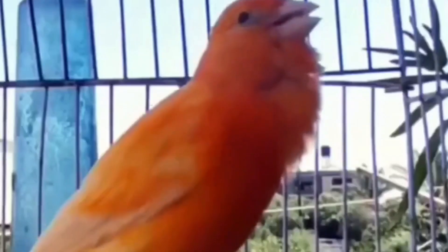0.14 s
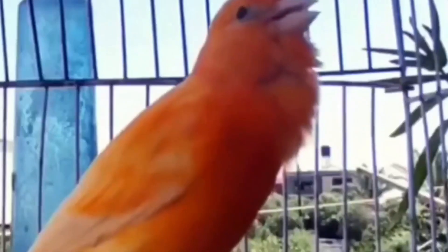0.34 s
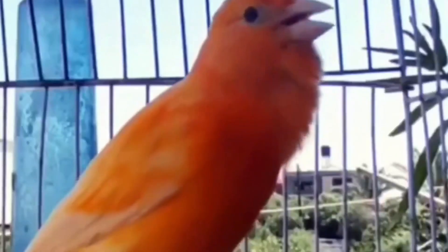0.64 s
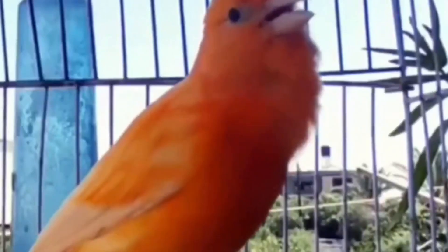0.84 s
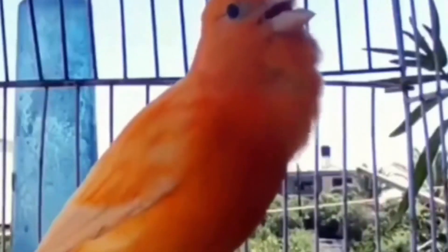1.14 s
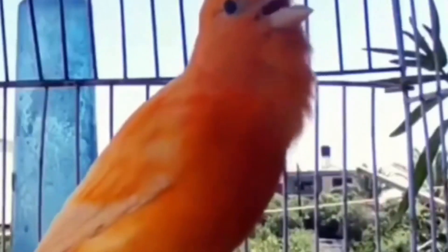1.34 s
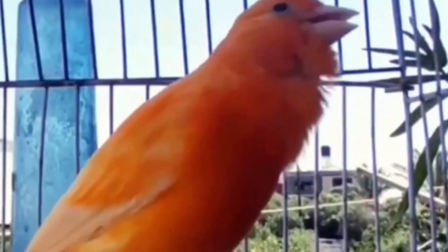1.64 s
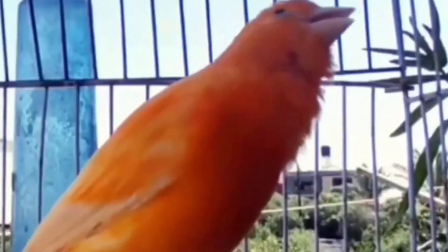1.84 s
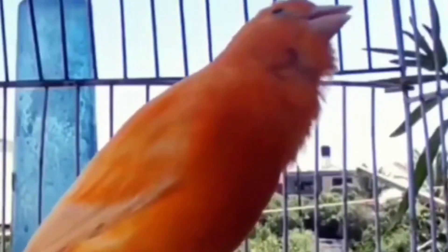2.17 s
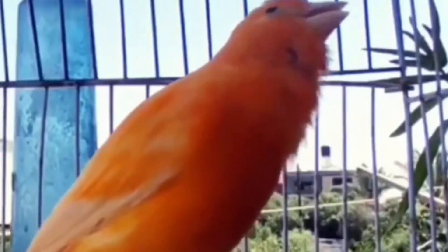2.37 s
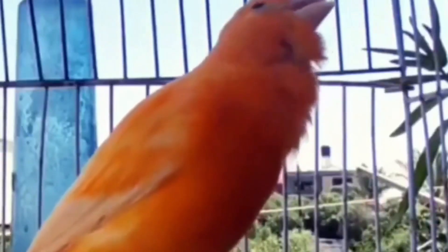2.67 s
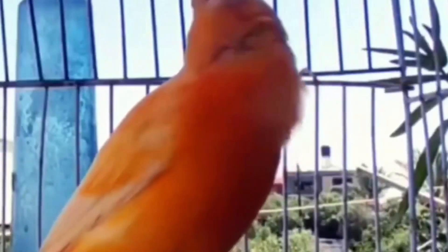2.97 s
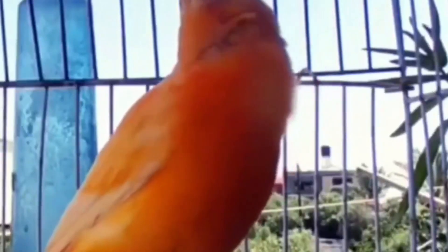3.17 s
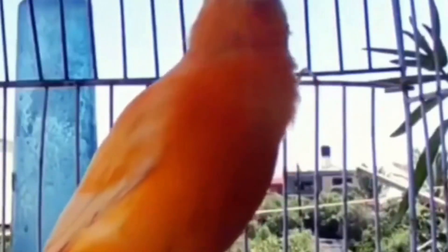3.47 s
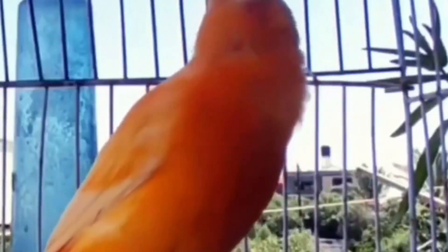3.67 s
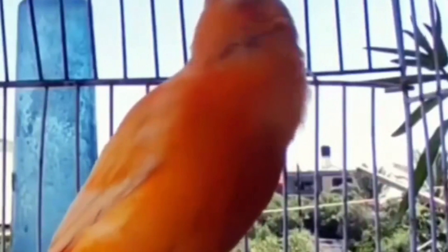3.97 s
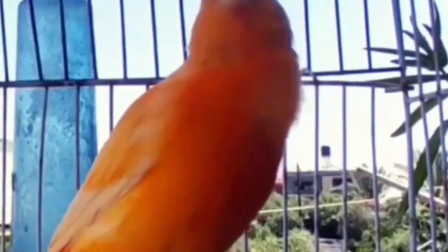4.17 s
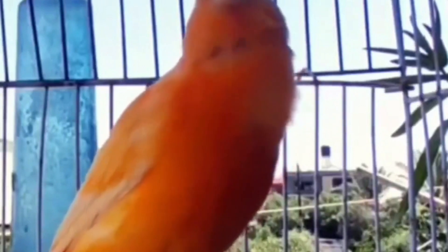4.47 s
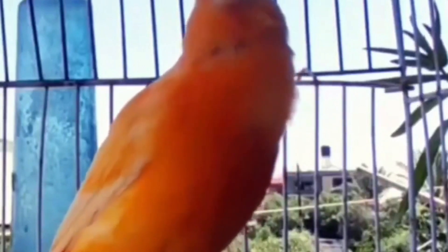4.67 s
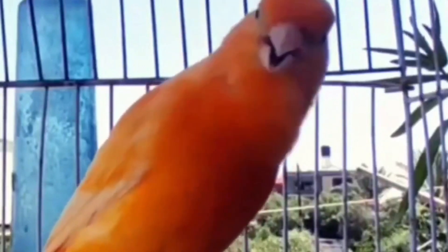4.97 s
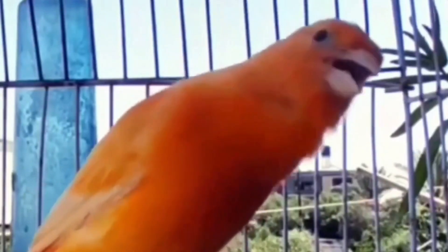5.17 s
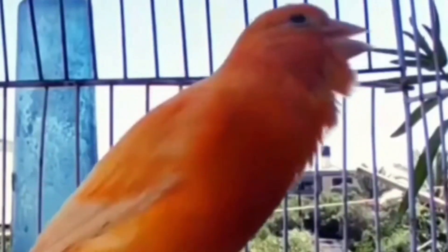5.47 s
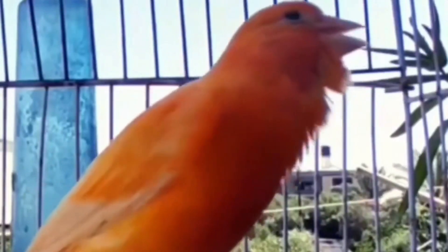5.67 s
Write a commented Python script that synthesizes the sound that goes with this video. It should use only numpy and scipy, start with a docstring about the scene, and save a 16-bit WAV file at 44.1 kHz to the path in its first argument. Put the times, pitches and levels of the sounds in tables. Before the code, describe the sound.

Loud, clear canary song, close and bright, on a balcony. A rapid burst of descending chirps turns into a slightly slower roll lasting nearly five seconds, its notes changing subtly from crisp to more drawn-out and back. A short steady pipe then switches to quick upward whistles, still going at the cut. Short diffuse reflections, a hissy phone microphone and very soft wind surround it.

```python
"""Canary on a balcony

A caged canary sings an arm's length from a phone: a quick trill, a long roll of falling whistles,
one piped note, then rising whistles. Each whistle is a sine that glides in pitch, roughened by noise.
Nearby walls add echoes of noise, a hiss and a wash follow the song's loudness, and wind rumbles.
Early on the level dips briefly, and it returns a little lower."""
import sys
import numpy as np
from scipy import signal
from scipy.fft import rfft, irfft
from scipy.io import wavfile
from scipy.ndimage import uniform_filter1d

SR = 44100
rng = np.random.default_rng(int(sys.argv[2]) if len(sys.argv) > 2 else 0)


def dump_mix(stems):
    """Bounce the given channels to the path in sys.argv[1] as a 16-bit WAV at rate SR."""
    frames = np.atleast_2d(stems).T  # one column per channel
    limited = np.clip(frames, -1, 1)  # hard clip at full scale
    pcm = np.round(limited * 32767).astype(np.int16)
    wavfile.write(sys.argv[1], SR, pcm)


N = 256220

# Whistle levels are those before the throat colours them.
# Every glide has a low end, a knee and a high end, joined by a low leg and a high leg.
# Quick falling whistles: (low end [s], low leg level [dB], high leg level [dB], noise share [0-1])
QUICK_TRILL = [(0.0976, -17, -27.5, 0.04), (0.1335, -15.5, -34, 0.5), (0.167, -14, -28, 0.2),
               (.203, -7, -36, 0.2), (0.2373, -13, -28, 0), (0.2733, -10.5, -27, 0.3),
               (0.308, -6.5, -26, 0), (0.3443, -11.5, -33, 0.66), (0.3819, -12.5, -26, 0.2),
               (0.418, -14, -26, 0.15), (.4532, -11, -29.5, 0.2), (0.492, -15, -29.5, 0.1),
               (0.5296, -21.5, -27.5, 0.11)]
# Falling whistles of the long roll; both legs play 1 % shorter than listed: (low end [s],
# low leg [ms], high leg [ms], low pitch [Hz], low leg level [dB], knee level [dB],
# high leg level [dB], top level [dB], left minus right [dB])
ROLL = [(0.693, 5.7, 20.6, 4740, -8, -15, -19, -18, -6),
        (0.7773, 11.6, 21, 4250, -11.5, -21.5, -26, -21, -2.5),
        (0.8605, 13.6, 25, 4370, -11.5, -23, -30, -20, -1.5),
        (0.9423, 14.6, 14.4, 4290, -12, -22, -29.5, -36, -4.5),
        (1.0244, 12.3, 17, 4300, -12.5, -20, -34, -22, -2.5),
        (1.102, 14.2, 18, 4270, -11, -19.5, -26, -27, -4.5),
        (1.1844, 13.8, 22, 4290, -10, -20.5, -27, -18, -3),
        (1.2655, 16, 16.6, 4270, -10.5, -21.5, -26, -28, -3),
        (1.347, 16.6, 38, 4230, -10.0, -23, -39, -34, -4),
        (1.435, 22.7, 12, 4250, -18, -12, -36, -39.0, -1),
        (1.5095, 16.2, 20, 4240, -9.5, -23.5, -30, -24, -4),
        (1.5887, 17.7, 15, 4215, -10.5, -26, -24.5, -18, -3.5),
        (1.672, 18.5, 15.6, 4195, -9.5, -25.5, -24, -18.5, -1),
        (1.759, 23.6, 12.0, 4180, -11, -27.5, -26, -30.0, -1.5),
        (1.847, 28.8, 19, 4080, -11, -30, -28, -23, -1.0),
        (1.9378, 38, 15, 3820, -11.5, -31, -31, -22, -0.5),
        (2.0256, 37.3, 19, 3970, -12, -26.5, -26.5, -46, -0.5),
        (2.1136, 36, 19, 3930, -11.5, -23.5, -22, -21, -1),
        (2.2018, 38.3, 18, 3894, -8.5, -24, -25.5, -18.5, -1.5),
        (2.2893, 36.5, 11.5, 3860, -12, -26, -25, -21, -1.5),
        (2.3788, 38.7, 17, 3830, -11.5, -28, -35, -42.0, -1),
        (2.468, 40.6, 15, 3795, -12, -29, -30, -22, -2),
        (2.5584, 42.5, 11.6, 3810, -11.5, -30, -27.5, -21, -1.5),
        (2.6444, 40, 12, 3820, -10.5, -31, -30, -20, -1),
        (2.7342, 40.3, 14.4, 3990, -12.5, -28.5, -29.5, -17, -2),
        (2.828, 40, 16.6, 3796, -12, -28, -28.5, -19.5, -1.5),
        (2.918, 35, 19, 3800, -11.5, -23, -23, -25, -3.0),
        (3.0061, 33, 16, 3880, -9.5, -36, -28, -17, -2.5),
        (3.099, 34.4, 20, 3870, -11, -23, -20.5, -16, -4.5),
        (3.19, 38.3, 16.6, 3820, -10.5, -21, -22, -20, -3.5),
        (3.2793, 30.8, 20, 3850, -10.5, -23, -20.5, -16, -5),
        (3.3753, 36.7, 19, 3775, -10.5, -29, -18.5, -15, -5.5),
        (3.469, 40.4, 19, 3535, -10.5, -26, -19, -24, -5),
        (3.563, 39.5, 19, 3610, -10.5, -25.5, -19.5, -15, -4.5),
        (3.649, 38.2, 15.2, 3740, -9.5, -20, -20, -8.5, -4),
        (3.7407, 34, 19, 3905, -10, -22.5, -20.5, -17, -3),
        (3.835, 37.5, 16.3, 3920, -10.5, -23.5, -18, -14, -5.5),
        (3.927, 30.5, 19, 3810, -10, -23, -22.5, -13, -5),
        (4.0133, 26.6, 20.0, 3976, -10.5, -23, -20.5, -13, -4),
        (4.0953, 15.8, 25, 4200, -10.5, -23.5, -33, -26, -5),
        (4.1746, 12.8, 25.5, 4140, -8.5, -20, -32, -15.5, -4),
        (4.253, 10.9, 18.6, 4150, -8, -21.5, -29.5, -13.5, -3.5),
        (4.3348, 11.2, 20.4, 4160, -8.5, -18, -26.5, -16, -4),
        (4.414, 10.6, 24.4, 4160, -7, -18.5, -29.5, -17, -5),
        (4.499, 10.7, 27.5, 4060, -9.5, -23, -23.5, -27, 1),
        (4.577, 12.4, 22.4, 4230, -9, -19.5, -23.5, -19.5, -4.5),
        (4.657, 13, 21.4, 4190, -10, -18, -27, -14.5, -5.5),
        (4.735, 12.7, 20.3, 4250, -8.5, -18.5, -24.5, -14.5, -5.0),
        (4.8156, 13, 12.8, 4160, -7.5, -17, -22, -26, -4.5),
        (4.8983, 11, 20.4, 4160, -9.5, -14.5, -32, -13, -5),
        (4.982, 13.3, 18.4, 4350, -10.5, -16, -23, -20, -4),
        (5.0678, 11.3, 20.3, 4240, -10.5, -20, -27, -17, -3),
        (5.16, 19, 22.4, 4280, -11, -21.5, -25.5, -18, 2.5),
        (5.242, 20.6, 19.0, 4280, -14, -28, -26.5, -28, -7.5),
        (5.3211, 13.8, 17.3, 4200, -9.5, -25, -23.5, -16, -2.0),
        (5.4016, 11, 19, 4170, -8, -14, -25.5, -36, -3.5)]
# Rising whistles: (low end [s], level [dB])
RISES = [(5.5218, -11.5), (5.585, -11.5), (5.647, -10.5), (5.7142, -11), (5.7806, -11)]
# First held note: (time [s], pitch [Hz], level [dB])
CHUP = [(0, 2600, -36), (.005, 2800, -28), (.009, 2930, -32), (.014, 2990, -24), (.018, 3000, -28),
        (.021, 3000, -42), (.032, 2950, -39), (.042, 2900, -50)]
# Piped note before the rising whistles: (time [s], pitch [Hz], level [dB])
PIPE = [(5.453, 5220, -38), (5.457, 5190, -21), (5.468, 5130, -16.5), (5.484, 5180, -18.5),
        (5.487, 5300, -23), (5.49, 5550, -19.5), (5.493, 5700, -40)]
# Thin puffs ahead of a whistle, 4 dB softer in the middle: (start [s], length [ms], centre [Hz], level [dB])
LISPS = [(0.635, 31, 6820, -31.5), (0.729, 27, 6800, -26.5), (.8, 20, 7000, -30), (0.891, 23, 6850, -26),
         (.965, 23, 7300, -35), (1.057, 21.5, 7000, -21.5), (1.12, 32, 6950, -23.5), (1.213, 31, 6900, -23),
         (1.292, 37, 6960, -32), (1.3796, 20, 6950, -27.5), (1.45, 23, 7000, -28), (1.538, 24, 6840, -29.5),
         (1.6165, 22, 6850, -25.5), (1.705, 24, 6930, -29), (2.584, 31, 6570, -27.5),
         (2.744, 20, 6800, -33), (2.844, 22, 6680, -28), (2.935, 21, 6840, -32), (3.589, 21, 6830, -33),
         (3.9604, 24, 7000, -30), (4.049, 29, 7100, -32), (4.2223, 27, 7000, -32), (4.284, 24, 6970, -23.5),
         (4.375, 29, 7000, -31), (4.4457, 19, 6870, -27.5), (4.512, 27, 7000, -32.5),
         (4.61, 24, 6800, -29.5), (4.686, 20, 7250, -33), (4.7706, 24, 6900, -29), (4.829, 35, 6950, -25),
         (4.931, 31, 6900, -26), (5.022, 27, 7000, -29), (5.095, 25, 6900, -28), (5.187, 23, 6960, -28.5)]
# Bursts of band noise that cover a whistle, whose tone sinks meanwhile:
# (start [s], length [ms], centre [Hz], width [Hz], level [dB])
NOISE_BURSTS = [(0.181, 22.6, 5000, 1600, -28), (.259, 10.4, 4660, 1200, -25), (0.293, 34, 4660, 1400, -30),
                (0.368, 9.7, 4700, 1200, -26), (0.681, 26, 4900, 1500, -31), (1.4, 27.6, 4720, 1020, -20.5),
                (2.168, 27.6, 4500, 895, -23.5), (2.973, 17.2, 5350, 450, -18),
                (3.803, 19.5, 4730, 1000, -25), (4.051, 27, 5600, 1400, -25),
                (4.478, 24.2, 4980, 1290, -19.5), (4.769, 22, 6030, 1300, -29),
                (4.866, 24.8, 5500, 900, -25.5), (5.145, 19.8, 4870, 1000, -23),
                (1.703, 25, 5900, 1400, -31.5), (5.388, 6.1, 5300, 800, -22), (5.588, 27, 4930, 1300, -18)]
# Broad puff as a falling whistle of the roll stops: (time [s], level against its low leg [dB])
END_PUFF = [(.7, -37.5), (1.2, -33.5), (1.8, -71), (3.6, -46), (4.1, -70), (4.55, -26.5), (4.9, -34),
            (5.4, -34)]
# How the throat colours a whistle: (pitch [Hz], gain [dB])
THROAT = [(3600, -9.5), (4200, 0), (4700, -2), (5250, 6.5), (5600, -1.5), (6100, -9), (6600, -9),
          (7200, 31)]
# A wide open throat, which colours nothing: (pitch [Hz], gain [dB])
OPEN_THROAT = [(3600, 0), (7200, 0)]
# Slow level of the faint line above the whistles: (time [s], level [dB])
TWIN_SWELL = [(1.6, -14), (2.0, 0), (3.8, 0), (4.1, -14), (5.45, -14), (5.55, -4)]
# Colour of the hiss; only the differences count: (frequency [Hz], level [dB])
HISS_COLOUR = [(120, 1.5), (500, 5), (2000, 3), (3050, 7), (3500, 3.5), (3900, 10.5), (7200, 11.5),
               (8500, 21), (8950, -13.5), (9550, 19), (9900, -7), (10600, 13), (11500, 5.5), (12300, 4),
               (12900, -16)]
# How three hiss ranges follow the song: (upper limit [Hz], smoothing [ms], power [], level [dB])
HISS_FOLLOW = (3944, 11.6, 0.48, -30), (9000, 8.2, 0.82, -30), (20000, 19, 0.59, -40)
# Slow level of the noise bands: (time [s], wash [dB], extra for the upper wash [dB],
# hiss under 4 kHz [dB], hiss up to 9 kHz [dB], hiss above [dB])
NOISE_SWELL = [(0, 14, -5, 4, 5.5, 2), (.55, 3, -6, 6.5, 7, 8.5), (.65, -13, 0, -4.5, -7, -18),
               (.69, 3.5, -1, 4.5, 0, 8), (.9, 2, 2, 4.5, 3, 6.5), (1.4, 1.5, 0, 5.5, 0, 1),
               (1.9, -0.5, -0.5, 4, 5, 2), (2.4, -1, 1.5, 4, 4.5, -1), (3.0, 1.5, -1.5, 4, 4, -1),
               (3.5, -1.5, 1.5, 5.5, 6, -1), (4.1, -1.5, 5.5, 4, 5.5, -1), (4.6, -3.5, 4.5, 5.5, 2.5, 6),
               (5.3, 5.5, -2.5, 5.5, 4.5, 3.5), (5.47, -5.5, -25, 5, 4, 8), (5.6, 8.5, 4, 8.5, -10, 15),
               (5.8, 4.5, 1.5, 7.5, 1, 11)]
# Strength of the wind: (time [s], level [dB])
WIND = [(0, -55), (.8, -60), (1.45, -52.5), (1.68, -57.5), (2.5, -56.5), (3.25, -49.5), (3.85, -53.5),
        (4.44, -55.5), (4.56, -37), (4.72, -53), (5.0, -46.5), (5.3, -55), (5.55, -48), (5.8, -48)]

QUICK_KNEE_HZ, KNEE_HZ = 4706, 5242
QUICK_LEGS_MS, QUICK_ENDS_HZ = (8.3, 8.2), (3360, 6030)  # low, high
QUICK_KNEE_DB, QUICK_TOP_DB, QUICK_PAN_DB = -20.5, -1, -0.8  # top against the high leg
ROLL_TOP_HZ, CLEAR_NOISE, BURST_NOISE = 6123, 0.019, 0.16  # noise share 0-1, without and with a burst
RISE_LEGS_MS, RISE_ENDS_HZ = (15, 19), (3737, 6030)  # low, high
RISE_KNEE_DB, RISE_HIGH_DB, RISE_HOOK_DB = -3.5, -2.5, -7  # all against the level of the whistle
RISE_PAN_DB, RISE_NOISE = -0.5, 0.079
END_FLICK_HZ = 343  # a falling whistle drops steeply as it stops
TWIN_ABOVE_HZ, TWIN_DB, TWIN_BAND_HZ = 6150, -38, (10000, 12100)  # faint line parallel to a whistle
TRILL_BAND_HZ = 3650, 7080  # the throat passes little of a trill outside this band
END_PUFF_MS, END_PUFF_EARLY_MS, END_PUFF_SCATTER_DB, END_PUFF_TREBLE_DB = 12.5, 8.9, 5, -5
NEAR_ECHO_DB, SIDE_ECHO_S, HELD_ECHO_DB = -47, 0.021, -14
WASH_LATE_MS = 11.6
DIP_S = 0.0594, 0.081  # start and end of the dip in level
PHONE_DB, TOP_HZ = -0.54, 13770


def undb(db):
    """Turn a level in dB into a gain."""
    return 10 ** (np.asarray(db) / 20)


def unit(x):
    """Scale a sound to an average strength (rms) of 1."""
    return x / np.sqrt(np.mean(x ** 2))


def stereo(mid, side):
    """Add the side sound on the left and subtract it on the right."""
    return mid + side * np.array([[1], [-1]])


def pan(left_minus_right_db):
    """Left and right gains."""
    return undb([[left_minus_right_db / 2], [-left_minus_right_db / 2]])


def over_time(table, column=1):
    """Read one column of a table at every sample; column 0 is the time."""
    columns = np.transpose(table)
    return np.interp(np.arange(N) / SR, columns[0], columns[column])


def on_log_hz(table, hz):
    """Read (frequency [Hz], level [dB]) points along a logarithmic pitch scale."""
    at, db = np.transpose(table)
    return np.interp(np.log(np.maximum(hz, 1)), np.log(at), db)


def band(lo_hz, hi_hz, size=N):
    """Noise between two edges, rms 1."""
    sos = signal.butter(2, [lo_hz, hi_hz], "bandpass", fs=SR, output="sos")
    return unit(signal.sosfilt(sos, rng.standard_normal(size)))


def steep(x, lo_hz, hi_hz):
    """Keep a band with sharp edges."""
    sos = signal.cheby2(6, 30, [lo_hz / 1.0593, hi_hz * 1.04], "bandpass", fs=SR, output="sos")
    return signal.sosfiltfilt(sos, x)


def loudness(song, swell_ms):
    """Strength (rms) of the song, smoothed twice over swell_ms."""
    size = int(swell_ms * SR / 1000)
    power = np.mean(song ** 2, axis=0)
    smooth = uniform_filter1d(uniform_filter1d(power, size), size)
    return np.sqrt(smooth.clip(0))


def puff(s, ms, hz, width_hz, db):
    """Where a short band of noise sits, its gate and the gated noise."""
    start, size = int(s * SR), int(ms * SR / 1000)
    gate = signal.windows.tukey(size, .4)
    noise = band(hz - width_hz / 2, hz + width_hz / 2, size=4096)[-size:]
    return slice(start, start + size), gate, undb(db) * gate * noise


def wind():
    """Wind on the microphone: low noise, mostly the same left and right, that swells in gusts."""
    gust = undb(over_time(WIND) + 1.4 * band(0.9, 33))
    rumble = 0.5 * band(19, 43.0) + 0.26 * band(32, 178)
    return gust * stereo(rumble, 0.15 * band(22, 95))


def hiss(song, bed_db=-70, side_db=-6.0):
    """Broad hiss that follows the song over a faint bed; half octaves flicker alone and together."""
    hz, out = np.fft.rfftfreq(N, 1 / SR), 0
    colour = undb(on_log_hz(HISS_COLOUR, hz)) * (hz > 90)
    colour = colour / np.sqrt(np.mean(colour ** 2))
    together_db = 0.88 * band(1.3, 7.8)
    follows = []
    for k, (_, ms, power, db) in enumerate(HISS_FOLLOW):
        moving = undb(db + together_db) * loudness(song, ms) ** power
        follows.append(undb(over_time(NOISE_SWELL, 3 + k)) * (moving + undb(bed_db)))
    for centre in 125 * np.sqrt(2) ** np.arange(14):
        # neighbouring half octaves overlap and crossfade
        octaves_away = abs(np.log2(hz + 1) - np.log2(centre))
        share = np.clip(1 - octaves_away * 2, 0, 1) ** .5
        mid, side = irfft(rfft(rng.standard_normal((2, N))) * colour * share, N)
        follow = follows[sum(centre >= row[0] for row in HISS_FOLLOW)]
        flicker = undb(3.9 * band(2.5, 21.8) - 3.0)
        out = out + follow * flicker * stereo(mid, undb(side_db) * side)
    return out


def wash(song, wash_db=-17, side_db=-5):
    """Grainy noise in the band of the trills; it follows the song smoothly and a little late."""
    grains = 0
    for lo_hz, hi_hz, db in [(4040, 4230, -4.0), (3920, 5280, 4.0), (4700, 5960, -15.5), (5720, 6520, -1.5)]:
        mid, side = band(lo_hz, hi_hz), band(lo_hz, hi_hz)
        upper_db = (lo_hz > 4500) * over_time(NOISE_SWELL, 2)
        flicker_db = 3.9 * band(0.99, 57)
        grains = grains + undb(db + upper_db + flicker_db) * stereo(mid, undb(side_db) * side)
    late_song = np.pad(loudness(song, 54), (int(WASH_LATE_MS * SR / 1000), 0))[:N]
    level = undb(wash_db + over_time(NOISE_SWELL, 1))
    return level * late_song * steep(unit(grains), *TRILL_BAND_HZ)


def walls(song, t60_s=0.18, tail_db=-40, near_s=0.0055, side_db=-42, alike=0.069):
    """Echoes of the walls: a fading tail, a smeared near echo and a later smeared one from the side."""
    t = np.arange(int(.4 * SR)) / SR
    mono, common = song.mean(axis=0), rng.standard_normal(len(t))
    tail = undb(tail_db) * undb(-60 * t / t60_s) * (t > .003)
    near = undb(NEAR_ECHO_DB) * np.exp(-((t - near_s) / 0.014) ** 2)
    # the share "alike" of the echo power is common to both sides
    both = np.sqrt(alike) * common + np.sqrt(1 - alike) * rng.standard_normal((2, len(t)))
    flank = undb(side_db) * np.exp(-((t - SIDE_ECHO_S) / 0.0048) ** 2) * rng.standard_normal(len(t))
    echoes = stereo(both * (tail + near), flank)
    return signal.fftconvolve(mono[None], echoes, axes=1)[:, :N]


def end_puffs(side_db=-8):
    """A broad puff of air, low and treble noise, where each falling whistle of the roll stops."""
    gate = np.zeros(N)
    for row, chance in zip(ROLL, rng.standard_normal(len(ROLL))):
        low_s, low_db = row[0], row[4]
        db = low_db + np.interp(low_s, *np.transpose(END_PUFF)) + END_PUFF_SCATTER_DB * chance
        start, size = int((low_s - END_PUFF_EARLY_MS / 1000) * SR), int(END_PUFF_MS * SR / 1000)
        gate[start:start + size] = undb(db) * np.hanning(size)
    mid, side = (band(320, 2700) + undb(END_PUFF_TREBLE_DB) * band(5900, 8600) for _ in range(2))
    return gate * stereo(mid, undb(side_db) * side)


def lisps(width_hz=450, side_db=-12):
    """Short narrow puffs of air near 7 kHz, made of gated noise."""
    out = np.zeros((2, N))
    for s, ms, hz, db in LISPS:
        at, _, mid = puff(s, ms, hz, width_hz, db - 4)
        _, _, side = puff(s, ms, hz, width_hz, db + side_db)
        out[:, at] += stereo(mid, side)
    return out


def croak(start_s=0.02, length_s=0.026, db=-40):
    """A faint rough afterthought under the first note: a short swell of narrow noise."""
    out, start, size = np.zeros(N), int(start_s * SR), int(length_s * SR)
    out[start:start + size] = undb(db) * np.hanning(size) * band(2210, 2540, size=size)
    return out


def covered(trills, pan_db=-7.5, left_db=-9, side_db=-5):
    """Bursts of band noise cover a whistle, whose tone sinks to left_db meanwhile."""
    kept, noise = np.ones(N), np.zeros((2, N))
    for row in NOISE_BURSTS:
        (at, gate, mid), (_, _, side) = puff(*row), puff(*row)
        kept[at] = undb(left_db * gate)
        noise[:, at] = mid + undb(side_db) * stereo(0, side)
    return kept * trills + noise * pan(pan_db)


def glide(row, knee_hz, way, edge_s, lead, bow):
    """Points (time [s], pitch [Hz], level [dB]) of one glide; a positive way falls, a negative one rises.
    The high leg lingers near the knee (bow under 1) and hooks steeply beyond its end by the share lead."""
    low_s, low_ms, high_ms, low_hz, high_hz, low_db, knee_db, high_db, top_db = row
    knee_s = low_s - way * low_ms / 1000
    high_s = knee_s - way * high_ms / 1000
    leg_s, leg_hz = high_s - knee_s, high_hz - knee_hz
    points = [(low_s + way * edge_s, low_hz - END_FLICK_HZ * (way > 0), low_db - 16.0),
              (low_s - way * edge_s, low_hz + (knee_hz - low_hz) * edge_s / low_ms * 1000, low_db),
              (knee_s + 0.45 * (low_s - knee_s), knee_hz + 0.54 * (low_hz - knee_hz), low_db),
              (knee_s, knee_hz, knee_db),
              (knee_s + 0.27 * leg_s, knee_hz + 0.25 * bow * leg_hz, high_db),
              (knee_s + 0.5965 * leg_s, knee_hz + 0.559 * bow * leg_hz, high_db),
              (high_s, high_hz, top_db),
              (high_s + lead * leg_s, high_hz + 2.88 * lead * leg_hz, top_db)]
    return sorted(points)


def whistle(notes):
    """Each whistle is a sine roughened by flutter, noisy notes are rough; a faint line runs 6150 Hz above."""
    out, twin, flutter, rough = np.zeros((2, N)), np.zeros(N), band(39, 296), band(245, 730)
    for points, throat, pan_db, noise_share in notes:
        s, hz, db = np.transpose(points)
        at = np.arange(max(int(s[0] * SR), 0), int(s[-1] * SR))
        soft_ends = signal.windows.tukey(len(at), .06)[at < N]
        at = at[at < N]
        pitch = np.interp(at / SR, s, hz)
        phase = 2 * np.pi * np.cumsum(pitch) / SR
        shake = np.sqrt(1 - noise_share) * (1 + 0.08 * flutter[at]) + np.sqrt(noise_share) * rough[at]
        level = undb(np.interp(at / SR, s, db) + on_log_hz(throat, pitch))
        gain = np.sqrt(2) * soft_ends * shake * level
        out[:, at] += gain * np.sin(phase) * pan(pan_db)
        twin[at] += gain * undb(TWIN_DB) * np.sin(phase + 2 * np.pi * TWIN_ABOVE_HZ * at / SR)
    return out, twin


def quick_trill():
    """Quick falling whistles, alike in pitch, coloured by the throat."""
    notes = []
    for s, db, high_db, noise_share in QUICK_TRILL:
        row = s, *QUICK_LEGS_MS, *QUICK_ENDS_HZ, db, QUICK_KNEE_DB, high_db, high_db + QUICK_TOP_DB
        notes.append((glide(row, QUICK_KNEE_HZ, 1, .0012, .12, .95), THROAT, QUICK_PAN_DB, noise_share))
    return notes


def roll():
    """Falling whistles coloured by the throat; one in which a noise burst starts is rougher."""
    notes = []
    for low_s, low_ms, high_ms, low_hz, *levels_db, pan_db in ROLL:
        start_s = low_s - (low_ms + high_ms) / 1000
        has_burst = any(start_s < row[0] < low_s for row in NOISE_BURSTS)
        row = low_s, low_ms, high_ms, low_hz, ROLL_TOP_HZ, *levels_db
        points = glide(row, KNEE_HZ, 0.99, 0.0019, .16, 0.732)  # 0.99: legs 1 % shorter
        notes.append((points, THROAT, pan_db, BURST_NOISE if has_burst else CLEAR_NOISE))
    return notes


def rises():
    """Rising whistles, sung with the throat wide open."""
    notes = []
    for s, db in RISES:
        row = (s, *RISE_LEGS_MS, *RISE_ENDS_HZ,
               db, db + RISE_KNEE_DB, db + RISE_HIGH_DB, db + RISE_HOOK_DB)
        notes.append((glide(row, KNEE_HZ, -1, .0012, .15, .55), OPEN_THROAT, RISE_PAN_DB, RISE_NOISE))
    return notes


def canary():
    """Held notes with a croak, and gliding whistles kept inside the trill band under a faint line."""
    held, _ = whistle([(CHUP, OPEN_THROAT, -1., 0), (PIPE, OPEN_THROAT, -.5, 0)])
    trills, twin = whistle(quick_trill() + roll() + rises())
    twin = signal.sosfilt(signal.butter(4, TWIN_BAND_HZ, "bandpass", fs=SR, output="sos"), twin)
    trills = steep(covered(trills), *TRILL_BAND_HZ) + twin * undb(over_time(TWIN_SWELL))
    return held + croak(), trills


def scene():
    """Bird, echoes, wash, hiss and wind, with the short dip in level."""
    held, trills = canary()
    trills = trills + lisps()
    song = trills + held + walls(trills + undb(HELD_ECHO_DB) * held)
    mix = song + wash(trills) + hiss(song - 0.7 * held) + end_puffs() + wind()
    start, stop = DIP_S
    dip_points_s = [start - .012, start + 0.0044, stop - .004, stop + 0.0043]
    # after the dip everything stays 3 dB lower
    dip_db = np.interp(np.arange(N) / SR, dip_points_s, [0.0, -62, -51, -3.0])
    return mix * undb(dip_db)


def record(dry):
    """The phone cuts the top with a very steep low-pass."""
    low_pass = signal.ellip(10, .2, 80, TOP_HZ, fs=SR, output="sos")
    return signal.sosfilt(low_pass, undb(PHONE_DB) * dry)


dry = scene()
out = record(dry)
dump_mix(out)
```